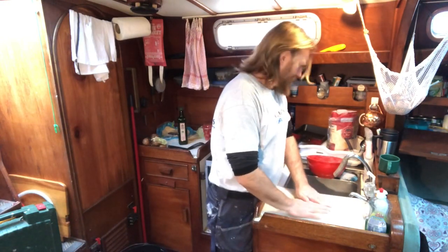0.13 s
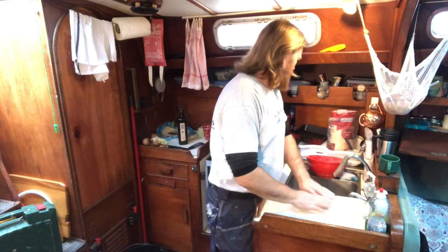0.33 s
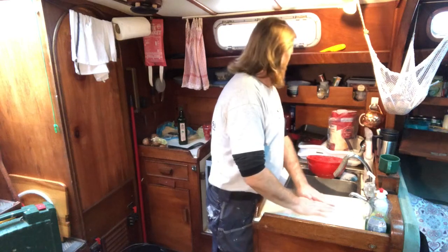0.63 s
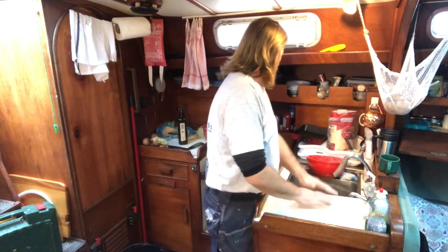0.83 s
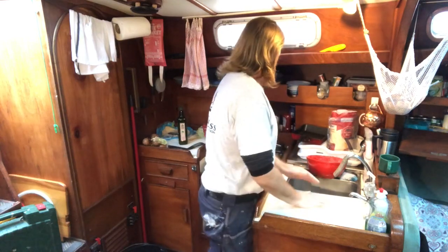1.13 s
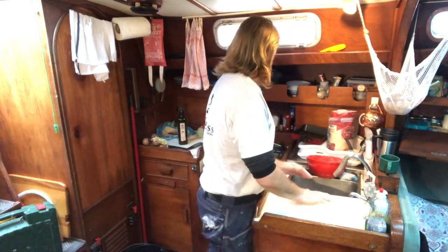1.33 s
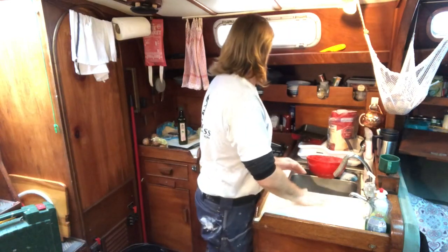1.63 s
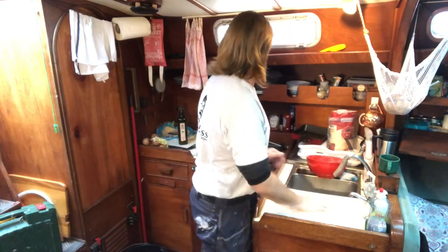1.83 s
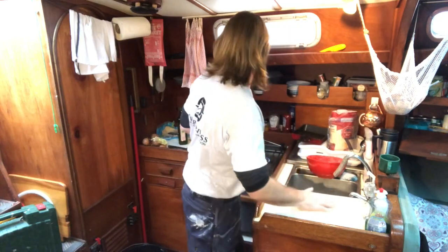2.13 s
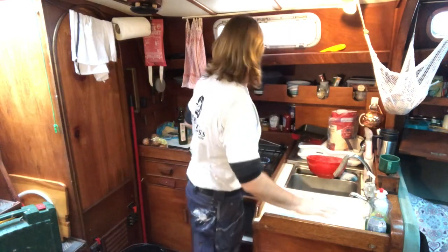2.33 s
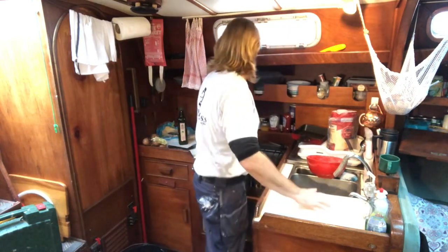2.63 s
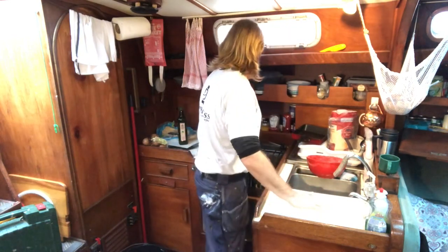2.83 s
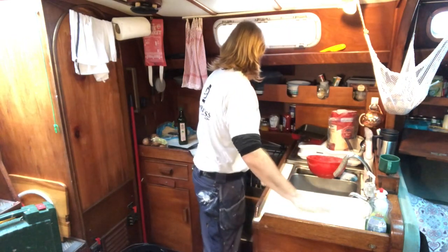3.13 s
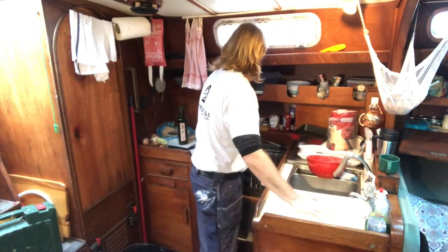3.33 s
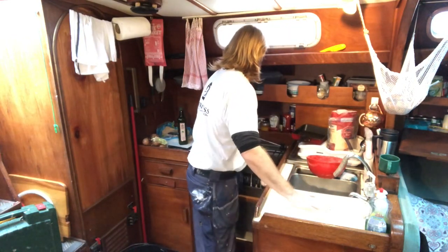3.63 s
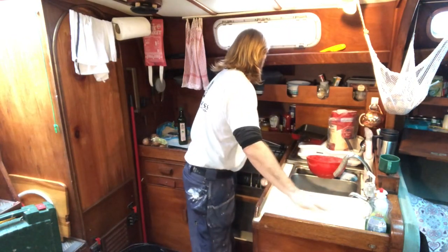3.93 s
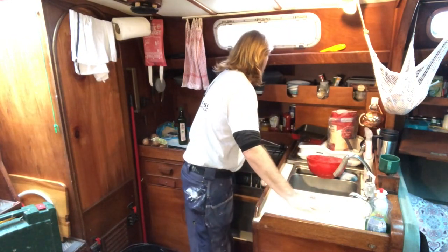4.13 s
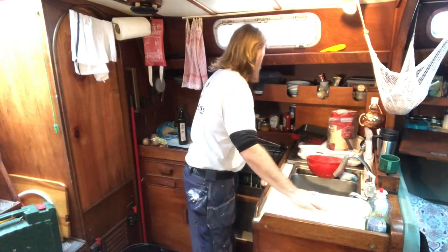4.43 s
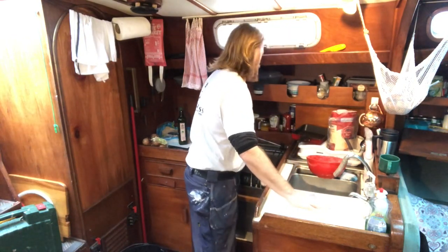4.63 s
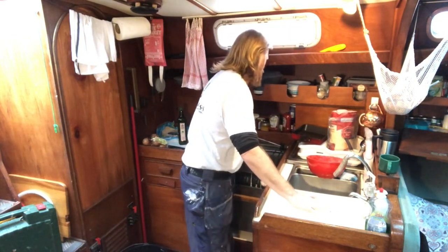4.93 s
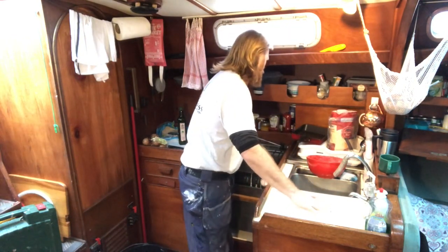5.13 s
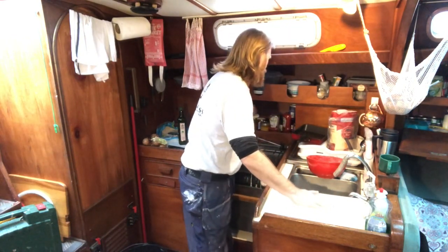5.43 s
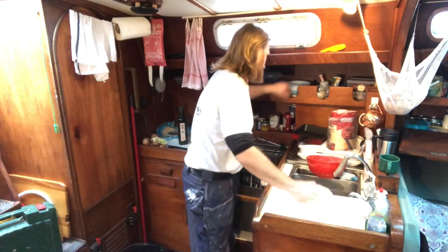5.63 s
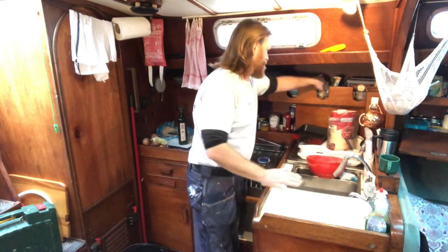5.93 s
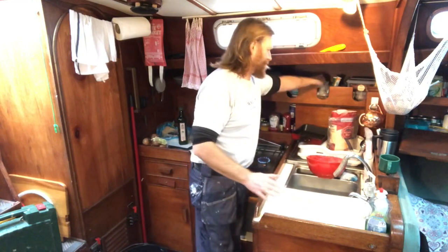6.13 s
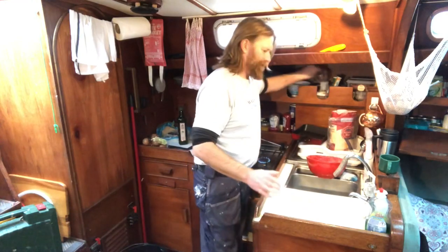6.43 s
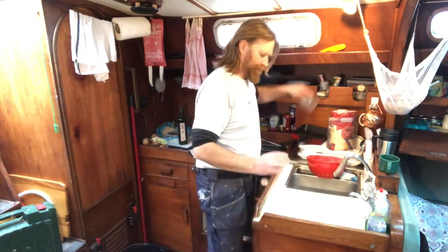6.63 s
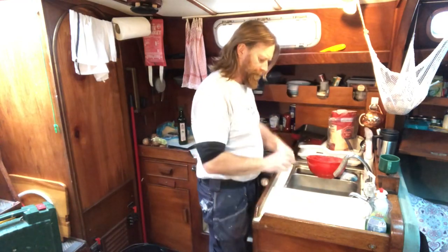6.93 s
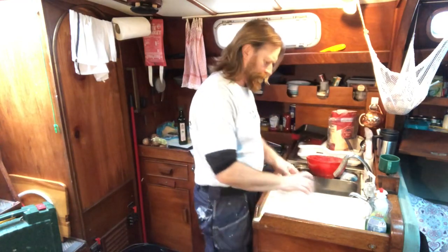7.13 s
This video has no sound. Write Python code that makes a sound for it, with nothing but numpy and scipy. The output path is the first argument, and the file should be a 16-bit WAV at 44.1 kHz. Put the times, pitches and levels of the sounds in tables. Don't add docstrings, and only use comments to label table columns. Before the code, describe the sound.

Soft low thumps and fleshy smacks of dough being pressed on wood, over a faint low hush. One heavy early thud makes small steel pieces ring high and briefly. Claps, knuckle knocks and dry floury drags continue irregularly; thin bird notes come from far off. A loud, short jar knock with a skin smack comes late, then a lid click and faint pats. Close, small wooden room with short reflections, small microphone with little deep bass.

```python
import sys
import numpy as np
from scipy import signal
from scipy.fft import rfft, irfft
from scipy.io import wavfile

SR = 44100
rng = np.random.default_rng(int(sys.argv[2]) if len(sys.argv) > 2 else 0)


def makeup_ratio(level_db):
    decades = np.asarray(level_db, float) / 20
    return 10 ** decades


def store_wav(level_fs):
    pcm = np.round(np.clip(np.atleast_2d(level_fs), -1, 1) * 32767)
    wavfile.write(sys.argv[1], SR, pcm.T.astype(np.int16))


N = 321048
TAIL_S = np.arange(SR * 7 // 10) / SR


def add(out, start_s, sound):
    at = round(start_s * SR)
    out[at:at + len(sound)] += sound[:N - at]


def filtered(x, order, hz, kind):
    return signal.sosfilt(signal.butter(order, hz, kind, fs=SR, output="sos"), x)


def coloured(spectrum, size):
    hz = np.maximum(np.fft.rfftfreq(size, 1 / SR), 1)
    point_hz, point_db = np.array(spectrum).T
    gain = makeup_ratio(np.interp(np.log(hz), np.log(point_hz), point_db))
    x = irfft(rfft(rng.standard_normal(size)) * gain, size)
    return x / x.std()


def drift(rate_hz):
    knots = rng.standard_normal(int(rate_hz * N / SR) + 2)
    return 1.2 * np.interp(np.arange(N) / SR * rate_hz, np.arange(len(knots)), knots)


def fade(t60_s, rise_s, t=TAIL_S):
    shape = (1 - np.exp(-t / rise_s)) ** 2 * np.exp(-np.log(1000) * t / t60_s)
    return shape / shape.max()


def struck(modes, luck, rise_s, ring=0.9, place_hz=None, focus_db=0.):
    longest_s = max(t60_s for _, _, t60_s in modes)
    t = TAIL_S[:round(SR * (.02 + 1.2 * ring * longest_s))]
    out = np.zeros(len(t))
    for (hz, level_db, t60_s), (uneven, turn) in zip(modes, luck):
        away_octaves = abs(np.log2(hz / place_hz)) if place_hz else 0
        gain = makeup_ratio(level_db - focus_db * away_octaves + 7 * (uneven - .5))
        out += gain * np.sin(2 * np.pi * (hz * t + 0.39 * turn)) * fade(t60_s * ring, rise_s, t)
    return out / np.abs(out).max()


def resonance(x, hz, width_hz):
    r = np.exp(-np.pi * width_hz / SR)
    y = signal.lfilter([1, 0, -1], [1, -2 * r * np.cos(2 * np.pi * hz / SR), r * r], x)
    return y / y.std()


# hz, db_per_hz
HUSH_SPECTRUM = [(15, -41), (25, -2.5), (80, -2), (242, -1.5), (451, -3.5), (545, -2.5), (624, -6.5),
                 (1560, -16), (2910, -17), (3620, -13.5), (3920, -15.5), (7710, -23), (8830, -27),
                 (14800, -29.5), (16000, -46)]


def hush():
    return makeup_ratio(-65) * coloured(HUSH_SPECTRUM, N)


# start_s, top_db, hull_db, wood_db, top_hz
SETTLES = [(.004, -56.5, -73, -77, 157), (.46, -53, -60, -63, 137), (.647, -60, -70, -72, 146),
           (1.831, -39, -45, -40.5, 290), (2.429, -47.5, -49.5, -72, 137), (2.798, -49, -59, -52.5, 159),
           (3.181, -63, -60, -50.5, 190), (3.91, -44, -75, -57, 323), (4.099, -31.5, -39.5, -60, 290),
           (4.939, -49, -45, -54, 256), (5.93, -60, -60, -65, 143)]
SETTLE = dict(top_ring=0.67, lag_s=0, wood_hz=520, wood_ring=1,
              smack_db=-67.5, smack_hz=2000, smack_ring=.8, edge_db=-25, plain=0.86)
# start_s, top_db, wood_db, smack_db, wood_hz
TAPS = [
    (.0502, -48, -63, -39, 1120),
    (1.1105, -36.5, -45, -29.5, 636),
    (2.3283, -38, -61, -34, 619),
    (2.3605, -60, -48, -42, 455),
]
TAP = dict(top_hz=280, top_ring=0.63, lag_s=0.0022, hull_db=-65, wood_ring=0.52,
           smack_hz=4100, smack_ring=0.36, edge_db=-16, plain=2.2)
# start_s, top_db, hull_db, wood_db, smack_db
PATS = [
    (.405, -41.5, -51, -46.5, -49.5),
    (.893, -31.5, -41, -43, -44),
    (1.341, -41.5, -46, -56, -49.5),
    (1.792, -29.5, -36, -43, -37),
    (2.687, -35, -49, -49, -38),
    (3.131, -38.5, -41.5, -48, -46.5),
    (3.6, -40, -53, -49, -44),
    (4.893, -32, -44.5, -49.5, -41.5),
    (5.3205, -39, -39, -52, -48),
    (6.799, -42.5, -47, -52, -49),
]
PAT = dict(top_hz=197, top_ring=.95, lag_s=0.00598, wood_hz=740, wood_ring=0.88,
           smack_hz=2200, smack_ring=0.61, edge_db=-19, plain=1)
# start_s, top_db, hull_db, wood_db, smack_db
CLAPS = [
    (.9695, -39.5, -58, -44, -53.5),
    (2.724, -34.5, -54, -39.5, -43.5),
    (4.055, -29.5, -40.5, -48, -33.5),
    (4.778, -57, -62, -45.5, -50),
    (4.792, -29, -50, -31.5, -38),
    (5.0335, -35, -52, -26.5, -39.5),
]
CLAP = dict(top_hz=201, top_ring=0.65, lag_s=0.00203, wood_hz=680, wood_ring=0.64,
            smack_hz=1780, smack_ring=0.44, edge_db=-30, plain=1.3)
# start_s, top_db, wood_db, smack_db, wood_hz
FLICKS = [
    (1.6735, -41, -43.5, -48, 1080),
    (2.27, -45, -34.5, -36, 970),
    (2.4814, -53.5, -51, -49.5, 810),
    (2.5104, -72, -62, -49, 1040),
    (2.5745, -59, -67, -44, 1270),
    (4.082, -52, -37, -43, 560),
    (6.977, -44, -52, -43, 452),
    (7.2275, -46.5, -54, -50.5, 620),
]
FLICK = dict(top_hz=240, top_ring=0.61, lag_s=0.0024, hull_db=-58, wood_ring=0.83,
             smack_hz=2090, smack_ring=0.59, edge_db=-26, plain=1)
# start_s, top_db, wood_db, smack_db, wood_hz
SLAPS = [
    (1.9112, -33.5, -43.5, -32, 860),
    (2.022, -40, -44.5, -38, 665),
]
SLAP = dict(top_hz=276, top_ring=0.63, lag_s=0.0023, hull_db=-63, wood_ring=0.47,
            smack_hz=2600, smack_ring=0.39, edge_db=-20.5, plain=2.9)
# start_s, top_db, hull_db, wood_db, smack_db
BLOWS = [
    (2.2173, -18, -25.5, -30.5, -37),
    (2.2415, -22, -42, -34, -36),
]
BLOW = dict(top_hz=290, top_ring=0.56, lag_s=0.0027, wood_hz=470, wood_ring=.6,
            smack_hz=1960, smack_ring=0.97, edge_db=-21, plain=0.92)
# start_s, top_db, wood_db, smack_db, smack_hz
RAPS = [(4.2445, -33.5, -37.5, -46.5, 3820), (4.309, -33, -28.5, -63, 2500),
        (4.347, -35.5, -38.5, -46, 3500), (4.388, -35, -34, -61, 2500), (4.492, -38.5, -39, -54.5, 1940),
        (2.513, -70, -75, -57.5, 9000), (5.0994, -74, -72, -56.5, 9000), (5.246, -57, -56.5, -77, 2000),
        (5.376, -63, -47, -75, 2000), (5.406, -65, -48.5, -63, 2000), (5.9145, -74, -61, -61, 4590),
        (5.9995, -48, -50, -41, 3170), (6.026, -47, -49, -52, 3110), (6.2853, -34.5, -60, -45, 3780)]
RAP = dict(top_hz=190, top_ring=0.63, lag_s=0.00515, hull_db=-66, wood_hz=590, wood_ring=0.66,
           smack_ring=0.58, edge_db=-14.5, plain=1)
# start_s, top_db, smack_db, smack_hz
GRIPS = [
    (6.0975, -25, -23, 2830),
    (6.8663, -69, -47, 3300),
]
GRIP = dict(top_hz=187.7, top_ring=.9, lag_s=.005, hull_db=-75, wood_db=-78.5, wood_hz=599, wood_ring=0.45,
            smack_ring=.9, edge_db=-17.5, plain=2.2)


def contacts():
    kinds = [
        (SETTLES, SETTLE, "top_db hull_db wood_db top_hz"),
        (TAPS, TAP, "top_db wood_db smack_db wood_hz"),
        (PATS, PAT, "top_db hull_db wood_db smack_db"),
        (CLAPS, CLAP, "top_db hull_db wood_db smack_db"),
        (FLICKS, FLICK, "top_db wood_db smack_db wood_hz"),
        (SLAPS, SLAP, "top_db wood_db smack_db wood_hz"),
        (BLOWS, BLOW, "top_db hull_db wood_db smack_db"),
        (RAPS, RAP, "top_db wood_db smack_db smack_hz"),
        (GRIPS, GRIP, "top_db smack_db smack_hz"),
    ]
    found = []
    for rows, rule, names in kinds:
        usual_hz = rule.get("smack_hz", 3000)
        for start_s, *values in rows:
            own = dict(zip(names.split(), values))
            found.append(dict(rule, start_s=start_s, usual_hz=usual_hz, **own) if not set(own) & set(rule)
                         else {**rule, "start_s": start_s, "usual_hz": usual_hz, **own})
    return found


# hz, level_db, t60_s
WORKTOP_MODES = [(153.1, -4, 0.46), (167.8, -2.5, 0.42), (192.4, 3, 0.19), (245.8, -2, 0.36),
                 (267, 1.5, 0.29), (299.7, 0, 0.26), (340.5, -2, 0.21), (359.8, 0.5, 0.4), (406.5, 2, 0.26)]
# hz, level_db, t60_s
HULL_MODES = [(44.3, -7.5, 0.14), (52.4, -13.5, 0.19), (60.45, 4, 0.33), (69, 3, 0.2), (91.8, 7.5, 0.51),
              (99.6, 1.5, 0.47), (116.4, -6.5, 0.73)]


def presses():
    top, hull = np.zeros(N), np.zeros(N)
    for c in contacts():
        top_luck, hull_luck = rng.random((2, 16, 2))
        press_s = c["start_s"] + c["lag_s"]
        boom = struck(WORKTOP_MODES, top_luck, 0.0022, c["top_ring"], c["top_hz"], focus_db=13.0)
        add(top, press_s, makeup_ratio(c["top_db"]) * boom)
        swell = struck(HULL_MODES, hull_luck, 0.0076, c["top_ring"])
        add(hull, press_s + 0.0087, makeup_ratio(c["hull_db"] + 3) * swell)
    return hull + filtered(top, 4, 115, "high")


# hz, level_db, t60_s
JOINERY_MODES = [(482, -12, 0.13), (545, -1, 0.11), (580.3, 2, 0.11), (619, 4.5, 0.077), (693, -4, 0.12),
                 (774, -6, 0.12), (812, 3.5, 0.052), (911, 3.5, 0.036), (1011, -4, 0.091),
                 (1120, -8.5, 0.064), (1183, 4.5, 0.048), (1324, -4.5, 0.1), (1442, -8.5, 0.24)]


def joinery():
    out = np.zeros(N)
    for c in contacts():
        luck = rng.random((20, 2))
        knock = struck(JOINERY_MODES, luck, 0.0017, c["wood_ring"], c["wood_hz"], focus_db=13.0)
        add(out, c["start_s"], makeup_ratio(c["wood_db"]) * knock)
    return filtered(out, 4, 300, "high")


# hz, db_per_hz
SMACK_SPECTRUM = [(820, -5.5), (1400, -6.5), (1910, -7.5), (2110, -11), (2600, -11), (3400, -12),
                  (4280, -11.5), (4820, -18.5), (5500, -18.5), (7150, -22), (12100, -120)]
# hz, db_per_hz
EDGE_SPECTRUM = [(2940, -29), (5000, -8), (5790, -8.5), (8060, -9.5), (9790, -16), (10600, -14),
                 (16000, -18.5)]


def smacks():
    width_share, rise_s, fingers_s, fingers_db = .29, .0018, .0062, -2
    peel_t60_s, peel_db, edge_db_per_octave = 0.2, -15, 5.5
    out = np.zeros(N)
    slap_noise = coloured(SMACK_SPECTRUM, N + len(TAIL_S))
    edge_noise = signal.lfilter([.6], [1, -.4], coloured(EDGE_SPECTRUM, N + len(TAIL_S)))
    for c in contacts():
        hz, ring, plain, peak_db = c["smack_hz"], c["smack_ring"], c["plain"], c["smack_db"]
        at = round(c["start_s"] * SR)
        slap, edge = slap_noise[at:at + len(TAIL_S)], edge_noise[at:at + len(TAIL_S)]
        colour = resonance(slap, hz, width_hz=width_share * hz) + plain * slap
        colour = colour / np.hypot(1, plain)
        palm = fade(0.059 * ring, rise_s)
        peel = makeup_ratio(peel_db) * fade(peel_t60_s, .004)
        smack_s = c["start_s"] + .0008
        add(out, smack_s, makeup_ratio(peak_db - 10.5) * colour * (palm + peel))
        add(out, smack_s + fingers_s, makeup_ratio(peak_db - 11 + fingers_db) * colour[::-1] * palm)
        edge_db = peak_db + c["edge_db"] + edge_db_per_octave * np.log2(hz / c["usual_hz"])
        edge_fade = fade(0.018, 0.00068) + 0.58 * fade(0.23 * ring, 0.0017)
        add(out, smack_s, makeup_ratio(edge_db) * edge * edge_fade)
    return out


def blip(hz, t60_s, spread):
    steps = (-2.2, -.9, 0, 1.2, 2.1)
    luck = [(.5, .1), (.5, .9), (.5, .5), (.5, 0), (.5, .7)]
    modes = [(hz * (1 + k * spread), -3.5 * abs(k), t60_s) for k in steps]
    return struck(modes, luck, rise_s=.0007)


# start_s, peak_db, pitch_hz, echo_db (relative)
CRACKS = [(.0508, -42, 3550, 2), (.0508, -54, 7300, 3), (1.1118, -37, 3900, 2), (1.794, -53, 6500, 2),
          (1.9125, -36, 3200, 3), (1.9125, -44, 6300, 3), (1.9125, -40, 1700, 3), (2.0235, -48, 2100, 3),
          (1.1118, -43, 2300, 2), (2.0235, -44, 3700, 1), (2.2205, -34, 2500, -8), (2.33, -38, 3800, 0),
          (2.329, -46, 11000, -4), (2.361, -44, 3750, 0), (2.376, -47, 3700, -1), (4.082, -45, 2800, -1),
          (4.352, -49, 3600, 1), (4.8925, -50, 3400, -3), (5.3225, -51, 2800, -3), (6.0982, -21, 3300, -9),
          (6.8005, -45, 2150, -8), (6.8685, -42, 3000, -9), (6.8685, -52, 6300, -6),
          (7.2285, -52, 2700, -3)]
# start_s, peak_db, pitch_hz, t60_s
POPS = [(.409, -52, 1500, .05), (1.1145, -36, 4300, .02), (1.803, -38, 270, .12), (2.229, -24, 200, .09),
        (5.37, -50, 480, .12), (7.232, -47, 140, .14), (1.1155, -43, 6820, .02), (1.1154, -40, 1915, 0.033),
        (1.794, -49, 3900, .05), (1.797, -42, 1300, 0.06), (1.796, -48, 2000, .03),
        (1.9125, -46, 5700, .02), (1.914, -42, 1355, 0.033), (2.2145, -48, 600, .04),
        (2.219, -33, 1920, 0.022), (2.222, -32.5, 1100, .04), (2.242, -35, 1490, .04),
        (2.272, -34, 994, .05), (2.281, -39, 1780, .03), (2.293, -45, 3500, 0.02), (2.278, -42, 4300, .03),
        (2.244, -46, 3900, .03), (2.332, -40, 4200, 0.03), (2.363, -44, 4000, .03),
        (2.577, -49, 2100, 0.044), (2.689, -46, 800, 0.054), (2.69, -48, 2490, 0.044),
        (4.058, -42, 1850, .06), (4.312, -47.5, 1600, .05), (4.79, -39.5, 3500, 0.017),
        (4.7938, -29, 574, 0.054), (4.806, -47, 1690, .06), (4.897, -50, 1495, .06),
        (5.036, -38.5, 1200, .03), (5.037, -48, 3400, .02), (6.08, -57, 1100, .06),
        (6.0985, -26, 3900, .015), (6.102, -36, 1700, 0.05), (6.103, -37, 4600, .06),
        (6.157, -52, 5600, 0.034),
        (.056, -49, 3900, .09), (2.247, -29, 290, .08), (5.932, -50, 150, .12), (6.002, -45, 740, .06),
          (6.024, -44, 720, .08), (6.006, -56, 1900, .08), (6.07, -52, 620, .06), (6.088, -48, 700, .04),
          (6.103, -32, 2700, .07), (6.12, -38, 3050, .1), (6.125, -30, 950, .12), (6.145, -32, 200, .15),
          (6.965, -52, 300, .08), (7.005, -47, 330, .1), (2.38, -50, 3700, .06), (3.925, -52, 330, .08),
          (4.075, -35, 200, .14), (2.035, -46, 900, .09), (2.05, -46, 150, .15), (3.3, -56, 55, .3),
          (1.125, -44, 900, .08), (4.065, -44, 2200, .04), (5.395, -48, 550, .08), (3.16, -52, 560, .1),
          (2.281, -38, 2400, .03), (2.292, -44, 2700, .03)]


def pops():
    crack_t60_s, crack_spread, echo_s = .011, .125, .0048
    out = np.zeros(N)
    for start_s, peak_db, hz, t60_s in POPS:
        add(out, start_s, makeup_ratio(peak_db) * blip(hz, t60_s, .075))
    for start_s, peak_db, hz, echo_db in CRACKS:
        add(out, start_s, makeup_ratio(peak_db) * blip(hz, crack_t60_s, crack_spread))
        add(out, start_s + echo_s, makeup_ratio(peak_db + echo_db) * blip(1.06 * hz, crack_t60_s, crack_spread))
    return signal.lfilter(*signal.iirnotch(5150, 5, SR), out)


# start_s, length_s, scuff_db, hiss_db, pitch_hz
SLIPS = [
    (1.93, 0.19, -61.5, -69, 3500),
    (2.3, 0.18, -62, -73, 3800),
    (5.9, 0.32, -72, -63.5, 3500),
    (6.868, 0.12, -70, -60.5, 3200),
    (6.972, 0.15, -63, -65, 2500),
    (6.1, 0.13, -44.5, -48.5, 2900),
    (4.075, .09, -56, -66, 3000),
    (1.115, .11, -56, -68, 3600),
    (2.235, 0.097, -48, -55, 3000),
    (2.266, .07, -50, -50, 3000),
]
# start_s, length_s, scuff_db, hiss_db, pitch_hz
SLIDES = [
    (2.43, 0.13, -64.5, -69, 2200),
    (6.03, .1, -62, -72, 1500),
    (2.2, .04, -58, -66, 1800),
    (2.55, 0.24, -52.5, -61, 2750),
    (3.64, 0.13, -66.5, -69, 3500),
    (4.3, 0.13, -56, -60.5, 3600),
    (3.84, .2, -66, -72, 2500),
    (5.18, 0.22, -67.5, -70, 3560),
    (7.15, 0.17, -66, -64, 3000),
]


def slides():
    out, t = np.zeros(N), np.arange(N) / SR
    grain = makeup_ratio(1.2 * drift(57) + 1.5 * drift(210))
    rough, hiss = coloured(SMACK_SPECTRUM, N), coloured(EDGE_SPECTRUM, N)
    bands = []
    for hz in (1500, 2200, 3200, 4400):
        once = resonance(rough, hz, width_hz=.6 * hz)
        bands.append((hz, resonance(once, hz, width_hz=.6 * hz)))
    for rows, top_share, ends_db, hiss_top_hz in ((SLIPS, 0.054, -24, 15500), (SLIDES, 0.44, -16, 9800)):
        flour = filtered(hiss, 1, hiss_top_hz, "low")
        for start_s, length_s, scuff_db, hiss_db, pitch_hz in rows:
            end_s = start_s + length_s
            edge = np.interp(t, [start_s, start_s + 0.0041, end_s - .03, end_s], [0, 1, 1, 0])
            away = np.interp(t, [start_s, start_s + top_share * length_s, end_s], [1, 0, 1])
            swell = makeup_ratio(ends_db * away ** 1.5)
            scuff = sum(makeup_ratio(-16 * abs(np.log2(hz / pitch_hz))) * band for hz, band in bands)
            out += edge * swell * (makeup_ratio(scuff_db) * scuff + makeup_ratio(hiss_db) * flour)
    return grain * out


# start_s, peak_db
JINGLE = [
    (2.2303, -46.5),
    (2.246, -37.5),
    (2.2597, -39),
    (2.272, -32.5),
    (2.285, -36),
    (2.2994, -71),
    (2.3144, -61),
]
# hz, level_db, t60_s
CUTLERY_MODES = [(6700, -5, .06), (7900, -9, .07), (8700, -7, .1), (9070, -4, .11), (9270, -9, .1),
                 (10140, -11, .08), (11420, -2, .11), (12200, -9, .1), (13300, -8, .08), (14010, -8, .09),
                 (14550, -13, .08), (15290, -8, .11), (15690, 0, .13)]


def cutlery():
    out = np.zeros(N)
    for start_s, peak_db in JINGLE:
        luck = rng.random((16, 2)) * [1, 4]
        add(out, start_s, makeup_ratio(peak_db - 4) * struck(CUTLERY_MODES, luck, rise_s=.0006))
    return out


# start_s, end_s, pitch_hz, level_db
BOTTLE_HUM = (3.64, 4.24, 1640, -79)


def bottle():
    start_s, end_s, hz, level_db = BOTTLE_HUM
    edge = np.interp(np.arange(N) / SR, [start_s, start_s + .03, end_s - .1, end_s], [0, 1, 1, 0])
    return makeup_ratio(level_db) * edge * resonance(rng.standard_normal(N), hz, width_hz=44)


# start_s, length_s, from_hz, to_hz, level_db
BIRD_GLIDES = [(4.56, .02, 7900, 7700, -78), (4.575, .02, 7600, 6600, -79), (4.597, .028, 6450, 6500, -72),
               (4.632, .05, 7800, 8250, -76), (4.78, .16, 8200, 8300, -80), (5.2, .04, 7650, 7300, -79),
               (5.24, .06, 7700, 8100, -79), (5.37, .04, 8400, 8500, -75), (5.41, .045, 8400, 7850, -78),
               (5.45, 0.1, 8030, 8230, -76), (5.778, .018, 8000, 7900, -72), (5.808, .04, 7350, 7350, -71),
               (5.85, .05, 7400, 7700, -79), (6.365, .04, 7050, 6850, -78), (6.405, .05, 7000, 7550, -78),
               (6.455, .055, 7700, 7800, -72), (6.51, .06, 7900, 8250, -76), (6.58, .065, 8250, 8450, -83),
               (6.34, .03, 8400, 7700, -79), (6.647, .07, 8500, 7350, -74.5),
               (6.72, 0.085, 7350, 7770, -72), (6.8, 0.062, 7770, 6900, -71.5),
               (7.08, .04, 8700, 8600, -77.5), (7.125, 0.015, 8500, 7950, -74),
               (7.135, .035, 7950, 7800, -69), (7.165, .03, 7500, 6750, -72), (6.98, .04, 7400, 8200, -74)]


def bird():
    out, smear, edge_s = np.zeros(N), .3 + drift(520), .008
    for start_s, length_s, from_hz, to_hz, level_db in BIRD_GLIDES:
        t = TAIL_S[:round(SR * (length_s + edge_s))]
        edge = np.interp(t, [0, edge_s, length_s, length_s + edge_s], [0, 1, 1, 0])
        hz = np.interp(t, [0, length_s], [from_hz, to_hz])
        add(out, start_s, edge * makeup_ratio(level_db) * np.sin(2 * np.pi * np.cumsum(hz) / SR))
    return smear * out


# hz, level_db, t60_s
JAR_MODES = [(380, -26, 0.25), (500, -11, 0.3), (560, -2.5, 0.12), (621, 0, 0.16), (671.5, 1.5, 0.12),
             (780, -1, 0.085), (836, -0.5, .15), (890, 1, 0.15), (943, -0.5, 0.093), (1095, -3, 0.099),
             (1153, -7, 0.083), (1220, -8.5, 0.076), (1304, -12, 0.15), (1415, -16, 0.12),
             (2640, -16, 0.064), (3160, -24, 0.11), (3600, -19, 0.061), (4020, -15.5, 0.07),
             (4100, -18, 0.025)]
# hz, level_db, t60_s
LID_MODES = [(2654, -3, .05), (2814, -4, 0.051), (2945, 0, 0.055), (3000, -4, .05), (3280, -3, .04)]


def jar():
    out, luck = np.zeros(N), rng.random((20, 2))
    add(out, 6.099, -makeup_ratio(-8) * struck(JAR_MODES, .2 * luck, .0009, ring=0.371))
    add(out, 6.287, makeup_ratio(-30.5) * struck(JAR_MODES[:14], luck, 0.00083, ring=0.24))
    add(out, 6.8675, makeup_ratio(-40) * struck(LID_MODES, luck, 0.00052))
    return filtered(out, 4, 300, "high")


def cabin(x):
    t60_s = .23
    white = rng.standard_normal(len(TAIL_S))
    dull = signal.lfilter([.35], [1, -.65], white)
    answer = dull * makeup_ratio(-60 * TAIL_S / t60_s) + 1.34 * white * makeup_ratio(-90 * TAIL_S / t60_s)
    answer = answer * (TAIL_S > .004)
    return signal.fftconvolve(x, answer / np.sqrt(np.sum(answer ** 2)))[:N]


def scene():
    bright = joinery() + smacks() + pops() + cutlery() + bird() + jar()
    dull = hush() + presses() + slides() + bottle()
    return (dull + bright + makeup_ratio(-7) * cabin(bright))[None]


def low_pass(x):
    return signal.sosfilt(signal.butter(12, 16450, fs=SR, output="sos"), x)


def record(dry):
    mix = filtered(dry, 6, 38, "high")
    mix = signal.sosfilt(signal.cheby2(18, 60, 16400, fs=SR, output="sos"), mix)
    return low_pass(mix)


dry = scene()
out = record(dry)
store_wav(out)
```